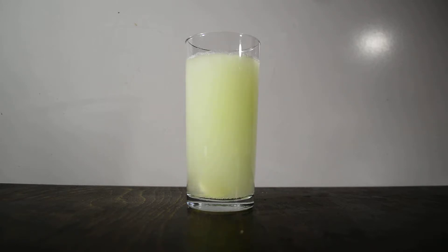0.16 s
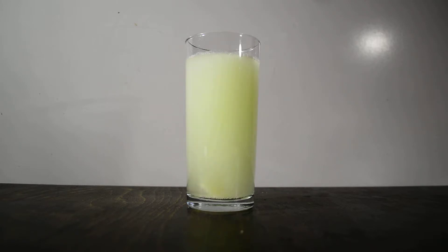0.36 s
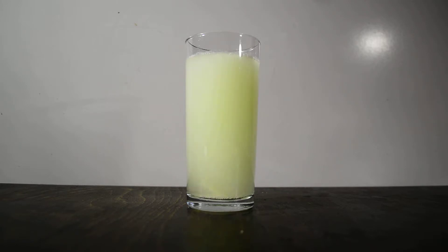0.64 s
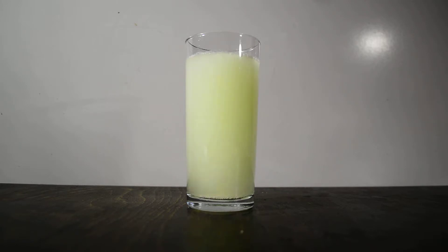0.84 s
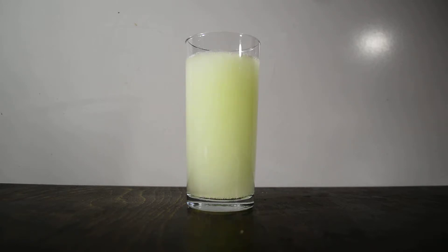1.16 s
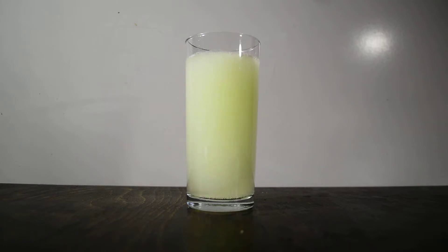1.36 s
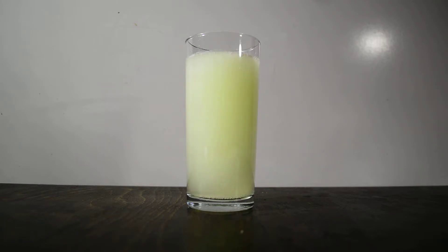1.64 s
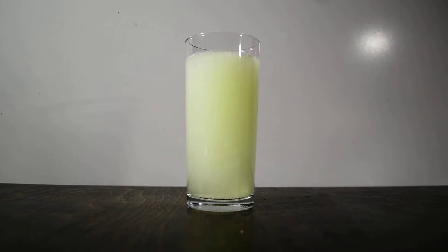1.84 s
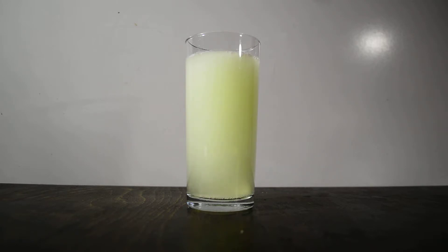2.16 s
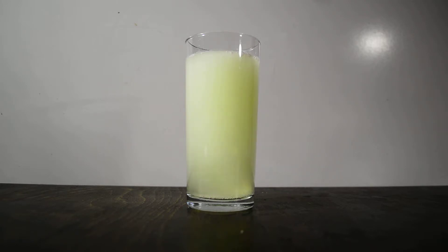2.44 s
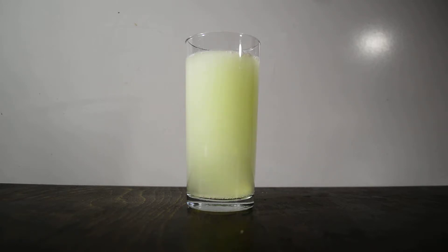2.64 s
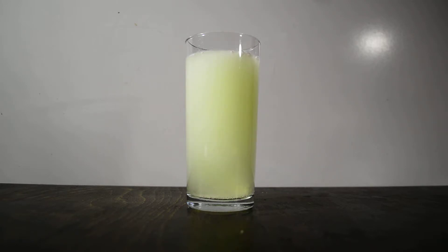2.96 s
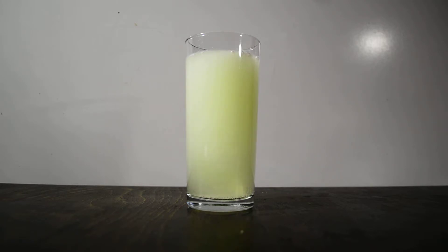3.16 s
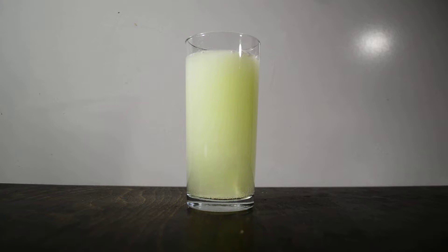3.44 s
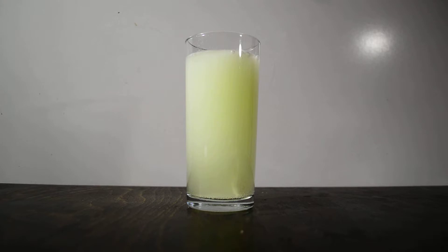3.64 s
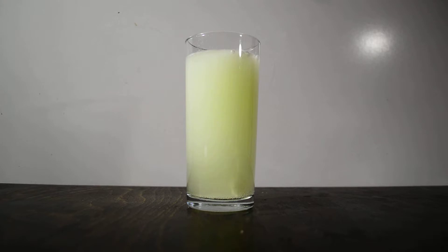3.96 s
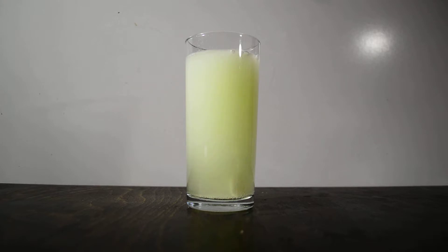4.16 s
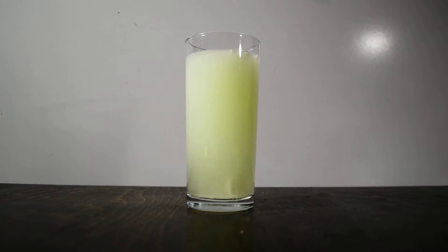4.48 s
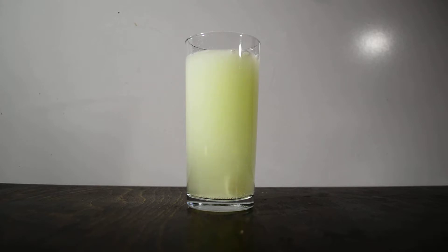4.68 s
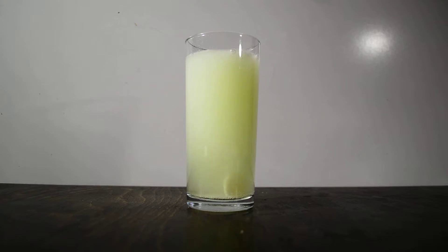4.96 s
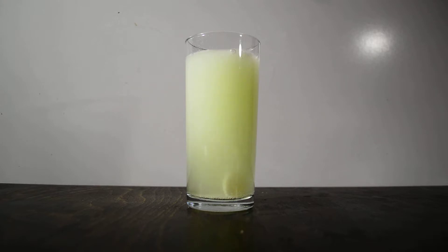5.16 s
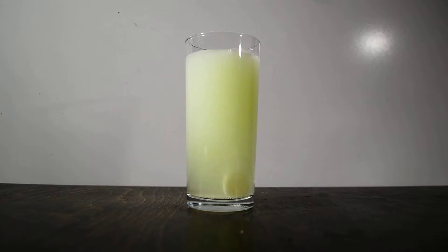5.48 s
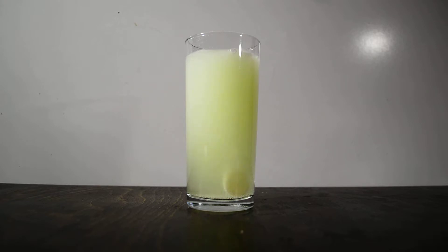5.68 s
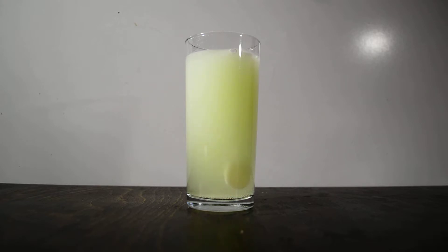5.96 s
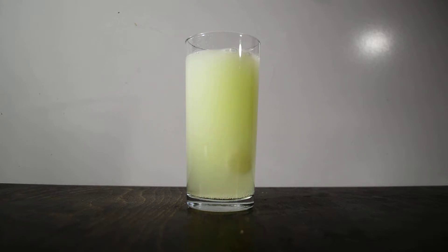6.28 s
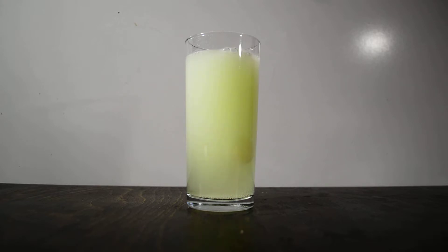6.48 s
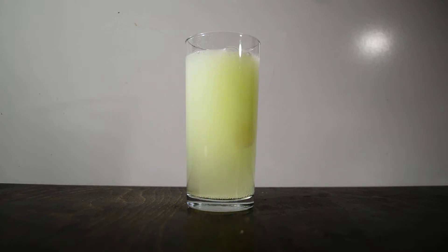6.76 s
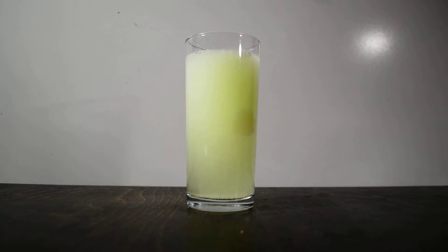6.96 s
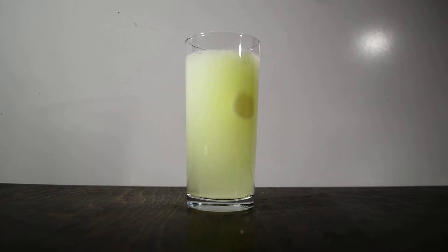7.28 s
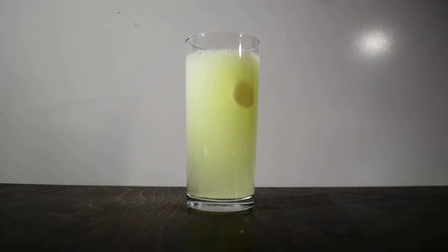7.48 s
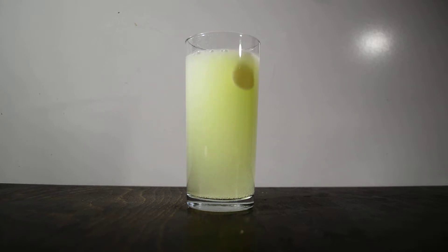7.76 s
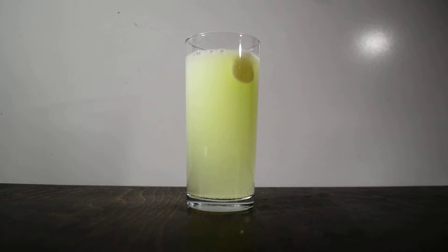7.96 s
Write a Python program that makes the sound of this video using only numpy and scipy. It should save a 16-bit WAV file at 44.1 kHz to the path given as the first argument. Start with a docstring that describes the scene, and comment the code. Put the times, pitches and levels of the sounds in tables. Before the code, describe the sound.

An effervescent tablet dissolves in a tall glass of water. Thousands of tiny bubbles burst in a continuous bright, crackly hiss, with a brief surge at the start, then a steady build to a fuller fizz. Near the end, as the tablet floats up, the fizz grows coarser and lower. Close stereo microphone in a quiet indoor room with faint low electrical hum.

```python
"""A dense, bright fizz surges and ebbs: an effervescent tablet dissolves in a tall glass of water.
Thousands of bubbles a second burst in the foam; each is a click that rings the air column and cross modes
of the glass above it, and the finest merge to a hiss. The gas flow builds, the tablet sheds its gas in surges,
and as it floats up the coarser bubbles gain on the finer ones. Behind it lie faint early reflections,
room air as shaped noise, and two low electrical hums as stacks of sines."""
import sys
import numpy as np
from scipy import signal
from scipy.fft import rfft, irfft, next_fast_len
from scipy.io import wavfile

SR = 44100
rng = np.random.default_rng(int(sys.argv[2]) if len(sys.argv) > 2 else 0)


def persist_wave(psi):
    """Save psi, clipped to +-1, as 16-bit WAV."""
    counts = np.round(np.clip(psi, -1, 1) * 32767).astype(np.int16)
    wavfile.write(sys.argv[1], SR, np.atleast_2d(counts).T)


N = 358091


def from_db(db):
    """Decibels to gain."""
    return 10 ** (np.asarray(db) / 20)


def balance(pan_db):
    """Left and right gains for a level difference, left over right."""
    return from_db([pan_db / 2, -pan_db / 2])


def rms_one(x):
    """Scale to rms 1."""
    return x / np.sqrt(np.mean(x ** 2) + 1e-20)


def stereo(mid, side, side_db, pan_db):
    """Left and right from a shared and an opposed part."""
    side = side * from_db(side_db)
    left_gain, right_gain = balance(pan_db)
    return np.array([(mid + side) * left_gain, (mid - side) * right_gain])


def in_frequency(rows, hz):
    """The columns of a spectrum, joined on a log-frequency axis."""
    points, *columns = np.transpose(rows)
    return [np.interp(np.log(hz + 1), np.log(points), c) for c in columns]


def coloured(pair, spectrum, side_db=0):
    """Give a mid-side pair a smooth spectrum and balance; the mean of left and right has rms 1."""
    size = next_fast_len(N)
    hz = np.arange(size // 2 + 1) * SR / size
    level_db, pan_db, *width_db = in_frequency(spectrum, hz)
    mid, side = rfft(pair, size) * from_db(level_db)
    out = irfft(stereo(mid, side, side_db + sum(width_db), pan_db), size)[:, :N]
    return out / np.std(out.mean(axis=0))


def drift(rate_hz):
    """Slow random wander of spread 1: noise through two equal low-pass poles near rate_hz."""
    step = 40  # samples between computed points
    warm_up = 2000  # points dropped while the filter settles
    r = np.exp(-2 * np.pi * rate_hz * step / SR)
    noise = rng.standard_normal(N // step + 2 + warm_up)
    slow = signal.lfilter([1], [1, -2 * r, r * r], noise)[warm_up:]
    return np.interp(np.arange(N) / step, np.arange(len(slow)), rms_one(slow))


def resonate(x, hz, width_hz):
    """A resonance applied twice, for steep skirts."""
    r = np.exp(-np.pi * width_hz / SR)
    stage = [1 - r, 0, r - 1, 1, -2 * r * np.cos(2 * np.pi * hz / SR), r * r]
    return signal.sosfilt([stage, stage], x)


def bursts(per_s, spread_db):
    """Random clicks of uneven size; where a bubble bursts sets its share in mid and side."""
    born = rng.random(N) < per_s / SR
    size = from_db(spread_db * np.minimum(rng.exponential(1, N), 6))  # the cap tames rare giants
    place = rng.uniform(0, 2 * np.pi, N)
    return born * size * np.array([np.cos(place), np.sin(place)]) + 1e-18


def bubbles(level_db, modes, per_s, spread_db, clump_db, clump_hz):
    """Bubbles of one size ring the air in the glass, per_s bursts to each mode, and clump in level."""
    out = 0
    for hz, width_hz, mode_db, side_db, pan_db in modes:
        mid, side = rms_one(resonate(bursts(per_s, spread_db), hz, width_hz))
        out = out + from_db(mode_db) * stereo(mid, side, side_db, pan_db)
    return out * from_db(level_db + clump_db * drift(clump_hz))


def large_bubbles(level_db):
    """Large bubbles burst and excite the middle resonances of the air in the glass."""
    # Each row: resonance in Hz, width in Hz, level in dB, side against mid in dB, left over right in dB.
    modes = [(3974, 550, -5, -3.5, -0.11), (4295, 380, -4, 0.5, -.4), (4528, 320, -5.5, -2.5, 0.7)]
    return bubbles(level_db, modes, per_s=3200, spread_db=1.2, clump_db=0.73, clump_hz=16)


def medium_bubbles(level_db):
    """Medium bubbles burst and excite the upper-middle resonances of the air in the glass."""
    # Each row: resonance in Hz, width in Hz, level in dB, side against mid in dB, left over right in dB.
    modes = [(4970, 310, -7.5, 0, 0.5), (5353, 360, -5.5, -1, 0), (5590, 520, -5.5, -1, -1.5),
             (6010, 480, -11, 0, 1), (6610, 880, -6, -.5, 4.5)]
    return bubbles(level_db, modes, per_s=3200, spread_db=2.0, clump_db=0.84, clump_hz=12)


def small_bubbles(level_db):
    """Small bubbles burst and excite high resonances of the air in the glass."""
    # Each row: resonance in Hz, width in Hz, level in dB, side against mid in dB, left over right in dB.
    modes = [(6600, 1160, -8, -4, 1.6), (7390, 300, -8.5, -8, 1.4), (7950, 810, -4.5, -2, 2.3),
             (8640, 600, -10.5, -4, 2.3)]
    return bubbles(level_db, modes, per_s=5000, spread_db=2.5, clump_db=0.9, clump_hz=22)


def coarse_bubbles(level_db):
    """The coarsest bubbles burst and excite the lowest, broad resonances of the air in the glass."""
    # Each row: resonance in Hz, width in Hz, level in dB, side against mid in dB, left over right in dB.
    modes = [(1375, 670, -14, -15, -5), (1980, 1000, -10.5, -21, -3.5), (2415, 320, -9.5, -13, -6),
             (2640, 345, -6, -10.5, -2), (2970, 630, -4, -18, -2.5), (3616, 600, -7, -14, -2)]
    return bubbles(level_db, modes, per_s=4000, spread_db=2.0, clump_db=0.5, clump_hz=11)


def finest_bubbles(level_db):
    """The finest bubbles are bare ticks, so many that they merge to a hiss."""
    # Spectrum of the tick. Each row: frequency in Hz, relative level in dB per Hz, left over right in dB.
    tick = [(900, -18, -4.5), (2200, -13, 0.5), (2700, -9.5, 1), (3330, -8, -2), (4360, -2.5, -2.5),
            (5740, -4.5, -1), (7390, 2, 0), (9200, 0.5, 5), (9900, -0.2, -1), (10300, 1, 1),
            (11200, -1.6, 5), (12600, 0.4, 0.2), (14300, -2.5, .7), (15900, -5.5, 4)]
    return from_db(level_db) * coloured(bursts(per_s=26000, spread_db=2.0), tick)


def foam_levels():
    """The level of each bubble size follows the gas flow and the height of the tablet."""
    # How each size answers, by name: level in dB at full flow, dB per dB of flow, dB gained once afloat.
    sizes = {"coarse": (-41.5, 0.76, 6.6), "large": (-37, 0.99, 3.9), "medium": (-38, 1, 1.5),
             "small": (-40.5, .36, -0.8), "finest": (-36.5, 0.37, -2.5)}
    t = np.arange(N) / SR
    # the flow builds along an S-curve as the tablet breaks up, then levels off
    growth_db, half_grown_s, growth_s = 12.5, 2.6, 0.82
    flow_db = -growth_db / (1 + np.exp((t - half_grown_s) / growth_s))
    # the thinned tablet floats up, ever faster, and the foam coarsens as it nears the surface
    lift_off_s, rise_s, rise_power = 6.63, 1.3, 1.74
    height = np.clip((t - lift_off_s) / rise_s, 0, 1) ** rise_power
    return {size: full_db + follows * flow_db + afloat_db * height
            for size, (full_db, follows, afloat_db) in sizes.items()}


def surges():
    """A cloud of bubbles reaches the surface, swells and ebbs: dB for large and for medium bubbles."""
    # Each row: time of the top in seconds, length in seconds, large bubbles in dB, medium bubbles in dB.
    clouds = [(0.0, 0.18, 5, 10), (0.16, 0.31, 1.5, 8), (1.125, .09, 1.5, 5), (1.642, .09, 4.5, .5),
              (2.038, 0.089, -1, 3), (2.75, .09, 3, 4), (3.583, .12, 3, 2.5), (3.871, .1, 0, 3),
              (4.013, .08, 7, 3), (4.107, 0.22, 4.5, -1), (5.037, 0.11, 2.5, 0), (5.7, 0.86, 2.5, 1),
              (6.85, 1.1, 0.5, 2.5), (7.29, 0.11, -2, 3.5), (7.95, 0.074, 1.5, 3.5)]
    t, out = np.arange(N) / SR, 0
    for top_s, length_s, *swell_db in clouds:
        swell = np.cos(np.pi * np.clip((t - top_s) / length_s, -.5, .5)) ** 2
        out = out + np.outer(swell_db, swell)
    return out


def plume_pans():
    """Where the gas reaches the surface moves the balance of the large and of the medium bubbles."""
    # Each row: time in seconds, large bubbles left over right in dB, medium bubbles left over right in dB.
    plume = [(0.2, -1.0, 1.0), (0.28, 2.5, 0.0), (0.33, 1, -2.0), (1.17, -2.5, -1), (1.39, -2, -3),
             (1.75, -3, -2.5), (4.37, -3.5, -3.5), (5.55, -4.5, 1.5), (5.92, -6.5, -2), (6.31, -1.5, -4),
             (7.95, 0, -2.0)]
    s, *pans_db = np.transpose(plume)
    return [np.interp(np.arange(N) / SR, s, pan_db) for pan_db in pans_db]


def fizz():
    """Five sizes of bubble share one gas flow; surges and plume shape the large and the medium."""
    level_db = foam_levels()
    large_surge_db, medium_surge_db = surges()
    large_pan, medium_pan = plume_pans()
    coarse = coarse_bubbles(level_db["coarse"])
    large = large_bubbles(level_db["large"] + large_surge_db) * balance(large_pan)
    medium = medium_bubbles(level_db["medium"] + medium_surge_db) * balance(medium_pan)
    small = small_bubbles(level_db["small"])
    finest = finest_bubbles(level_db["finest"])
    return coarse + large + medium + small + finest


def reflections(x):
    """Each nearby surface returns a late, duller copy to each side."""
    # Each row: left delay in seconds, right delay in seconds, level in dB.
    echoes = [(.00878, .00874, -19.5), (0.0109, .00597, -15.5), (.0202, .0104, -31)]
    dull = signal.sosfilt(signal.butter(2, 5500, fs=SR, output="sos"), x)  # low-pass in Hz
    t, out = np.arange(N) / SR, 0
    for *delays, level_db in echoes:
        late = [np.interp(t - delay, t, side, left=0) for delay, side in zip(delays, dull)]
        out = out + from_db(level_db) * np.array(late)
    return out


def room_air():
    """The air of the quiet room: steady noise, strongest in the low end."""
    # Each row: frequency in Hz, relative level in dB per Hz, left over right in dB, side against mid in dB.
    spectrum = [(15, -11, 10, 0), (36, -7, 9, 2), (76, -4.5, 0, 0), (124, 1.5, 0, 0), (164, -3, 9, -3.5),
                (274, -3, -4, -1), (340, 1, 0.5, -8), (457, -2.5, -2.5, -6), (835, -4.5, -3.5, -4),
                (980, -3, -4.5, -7), (1600, -5, -6, -21), (4000, -27.5, 2, -2)]
    return from_db(-54.5) * coloured(rng.standard_normal((2, N)), spectrum)


def hum(base_hz, overtones):
    """A steady electrical hum: sines at exact multiples of the base, each with a random phase."""
    turns, out = base_hz * np.arange(N) / SR, 0
    for multiple, level_db, pan_db in overtones:
        tone = np.sqrt(2) * from_db(level_db) * np.sin(2 * np.pi * (multiple * turns + rng.random()))
        out = out + tone * balance(pan_db)[:, None]
    return out


def mains_hum():
    """The mains hum, with its overtones."""
    # Each row: multiple of the base, rms level in dB before panning, left over right in dB.
    overtones = [(1, -61.5, 18), (2, -76, 2), (3, -63, 1), (4, -62, -3), (5, -67, -4), (6, -74, 2),
                 (7, -76, -9), (11, -80, -5), (13, -79, -3), (14, -79, 2)]
    return hum(50.02, overtones)


def motor_hum():
    """A second low hum, from a motor, with its overtones."""
    # Each row: multiple of the base, rms level in dB before panning, left over right in dB.
    overtones = [(1, -63, 5), (2, -66, 1), (3, -71, 0), (4, -72, -1)]
    return hum(60.02, overtones)


def scene():
    """The fizz and its reflections over the quiet, humming room."""
    foam = fizz()
    return foam + reflections(foam) + room_air() + mains_hum() + motor_hum()


def record(dry):
    """A steep low-pass removes the top of the treble."""
    cutoff_hz, ripple_db, stop_db = 15750, .1, 80
    return signal.sosfilt(signal.ellip(14, ripple_db, stop_db, cutoff_hz, fs=SR, output="sos"), dry)


dry = scene()
out = record(dry)
persist_wave(out)
```